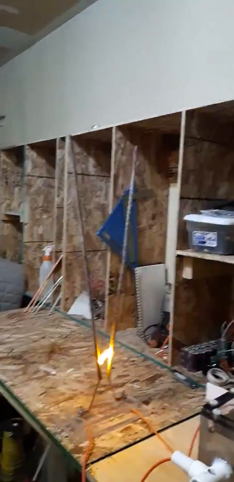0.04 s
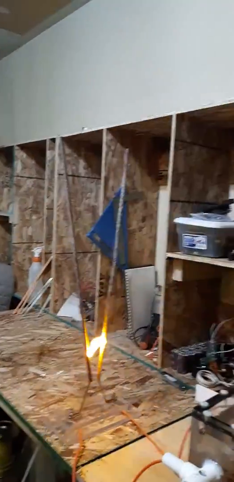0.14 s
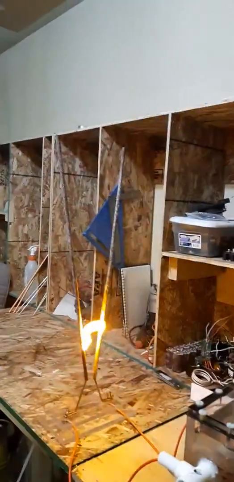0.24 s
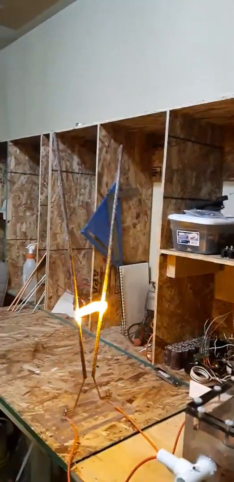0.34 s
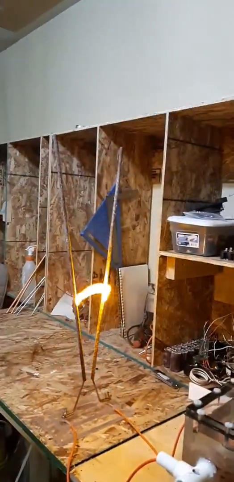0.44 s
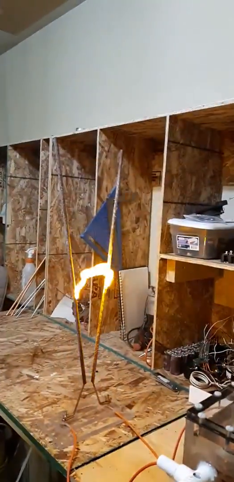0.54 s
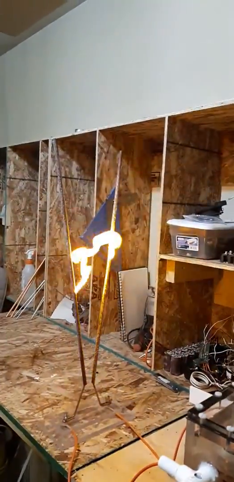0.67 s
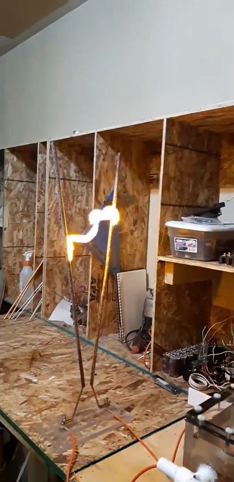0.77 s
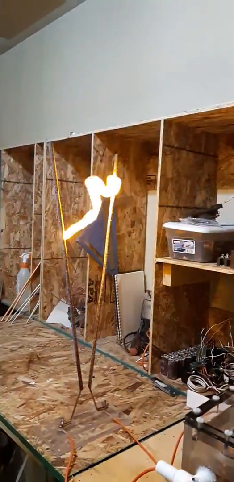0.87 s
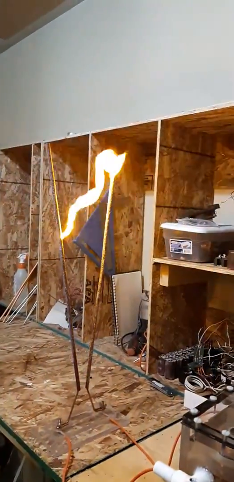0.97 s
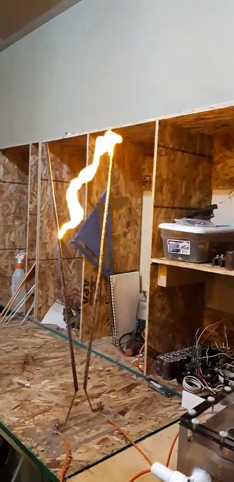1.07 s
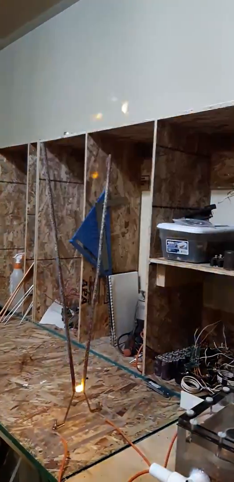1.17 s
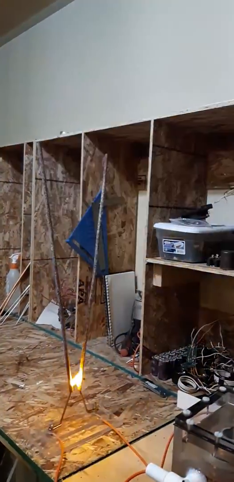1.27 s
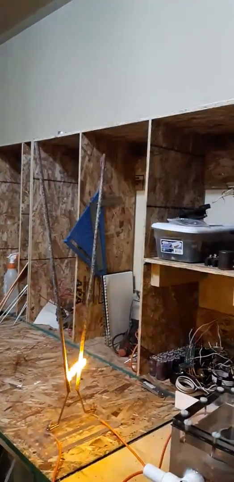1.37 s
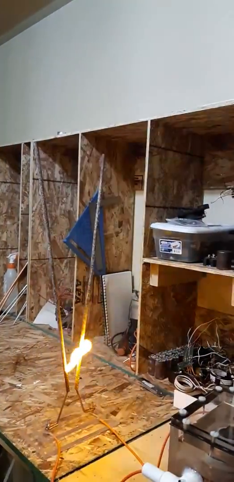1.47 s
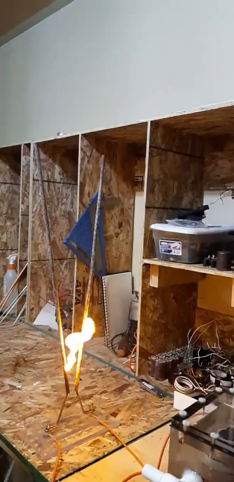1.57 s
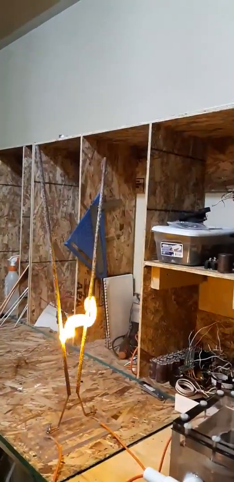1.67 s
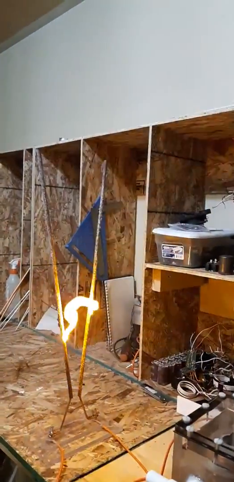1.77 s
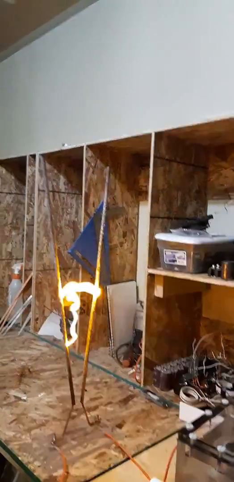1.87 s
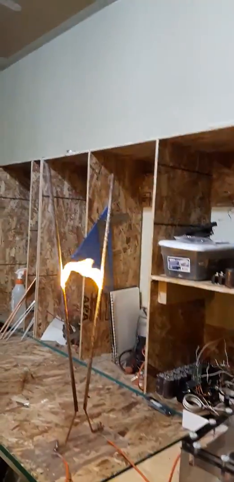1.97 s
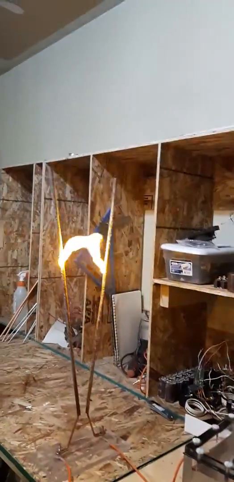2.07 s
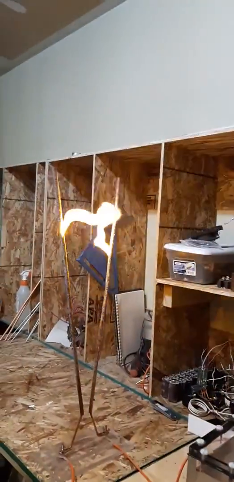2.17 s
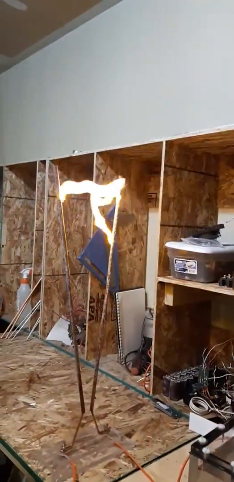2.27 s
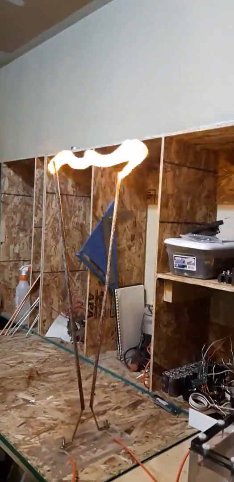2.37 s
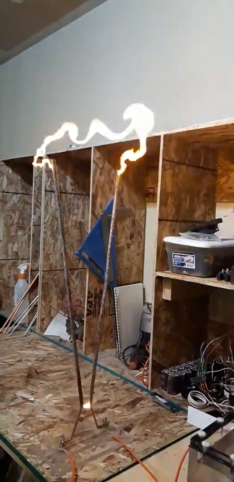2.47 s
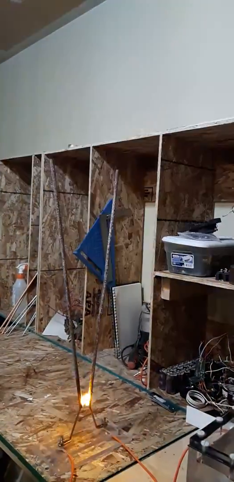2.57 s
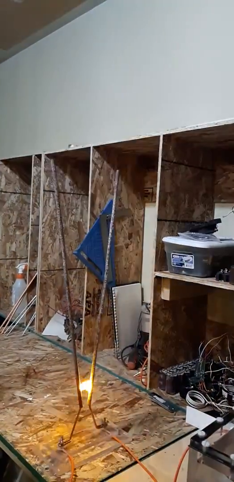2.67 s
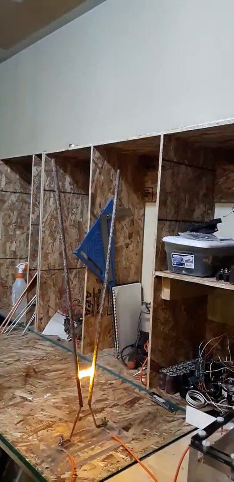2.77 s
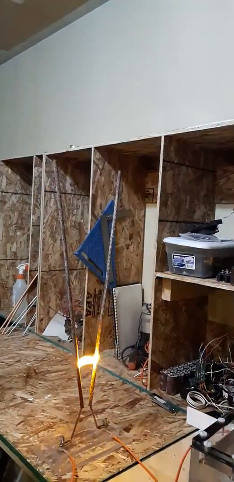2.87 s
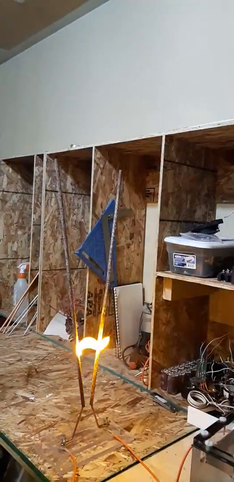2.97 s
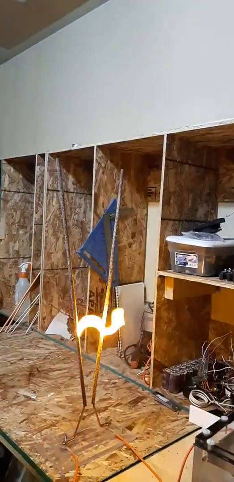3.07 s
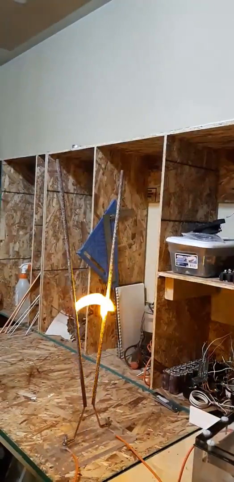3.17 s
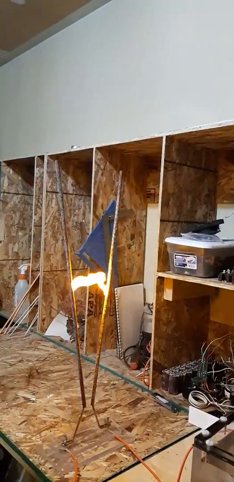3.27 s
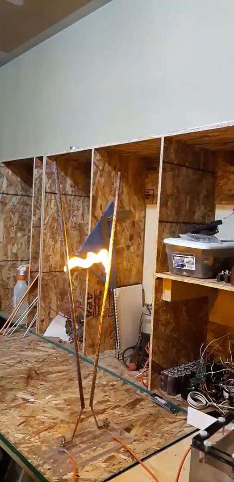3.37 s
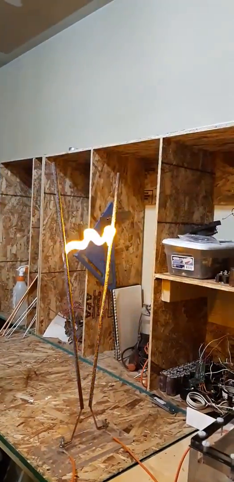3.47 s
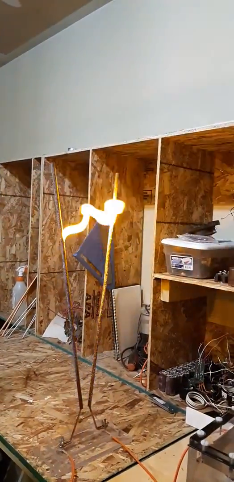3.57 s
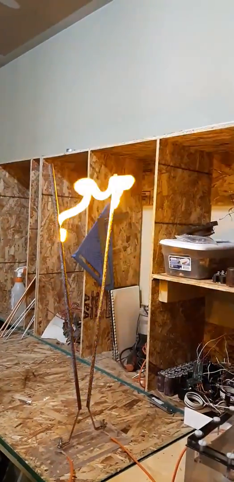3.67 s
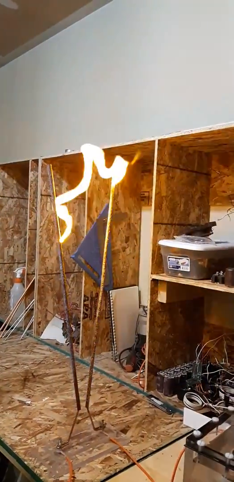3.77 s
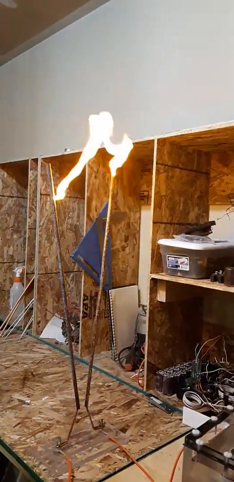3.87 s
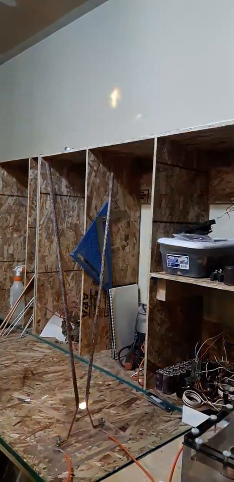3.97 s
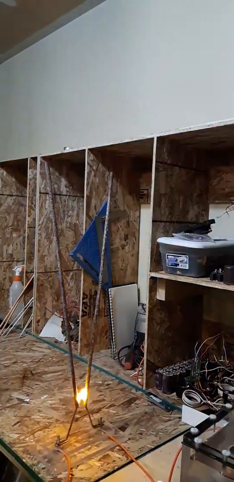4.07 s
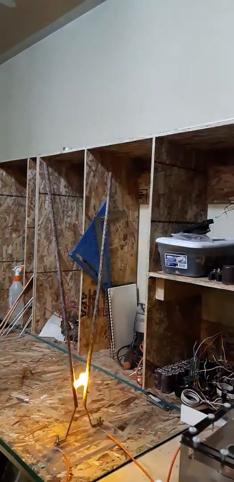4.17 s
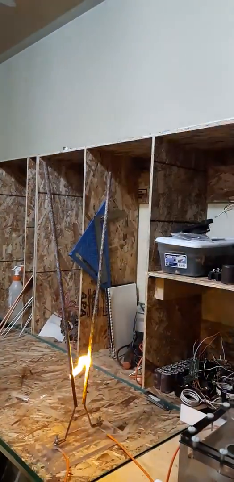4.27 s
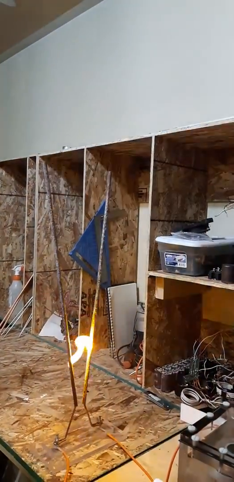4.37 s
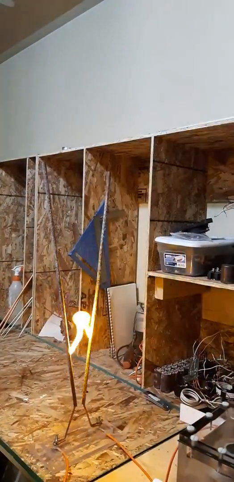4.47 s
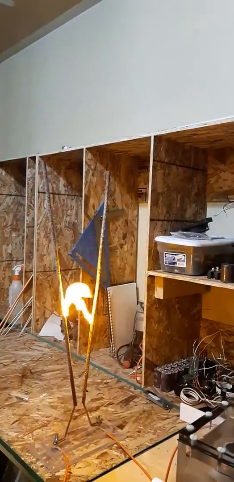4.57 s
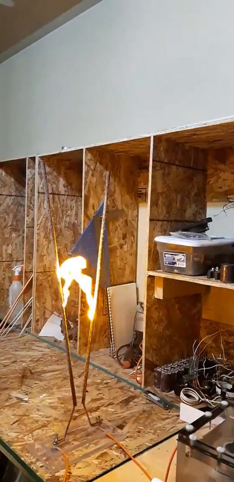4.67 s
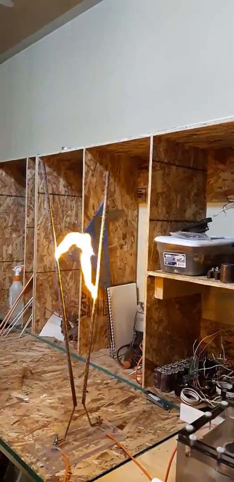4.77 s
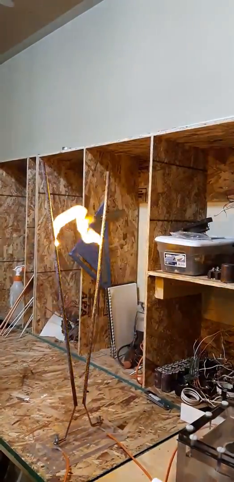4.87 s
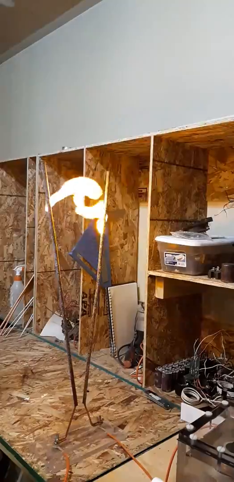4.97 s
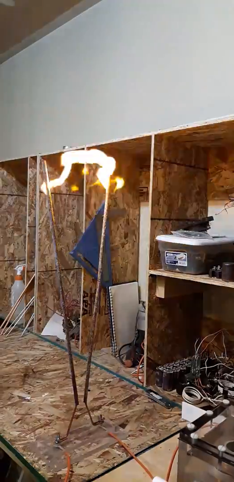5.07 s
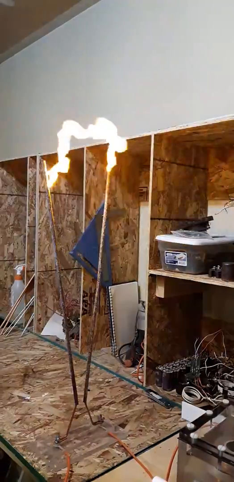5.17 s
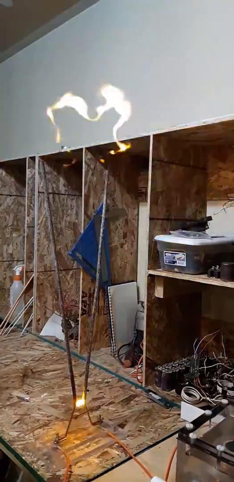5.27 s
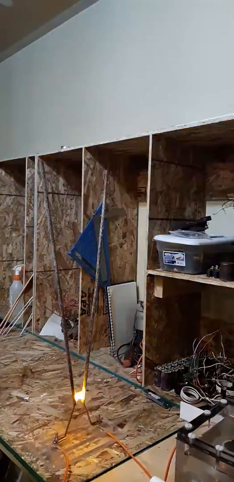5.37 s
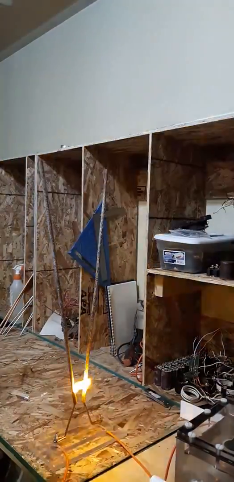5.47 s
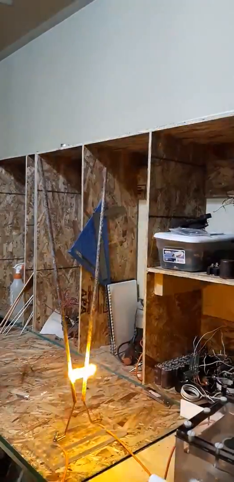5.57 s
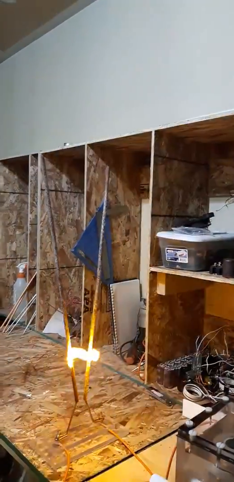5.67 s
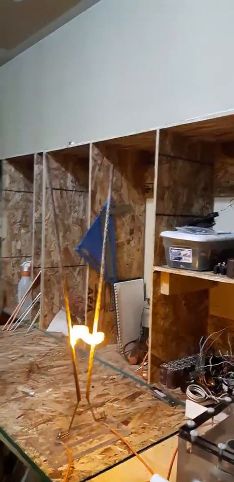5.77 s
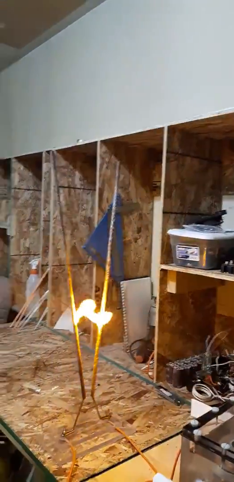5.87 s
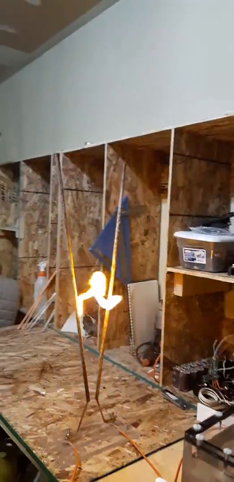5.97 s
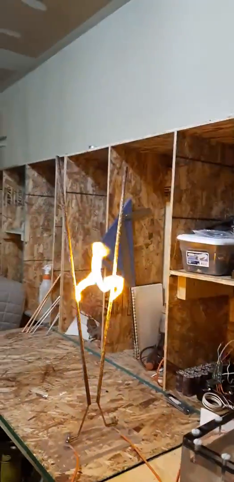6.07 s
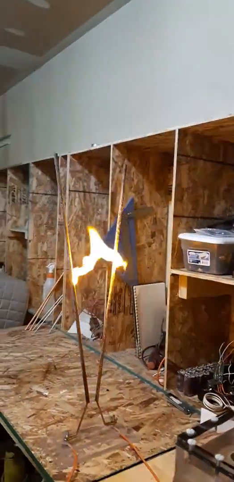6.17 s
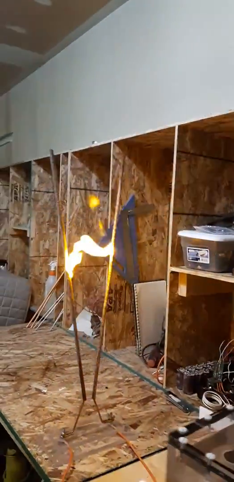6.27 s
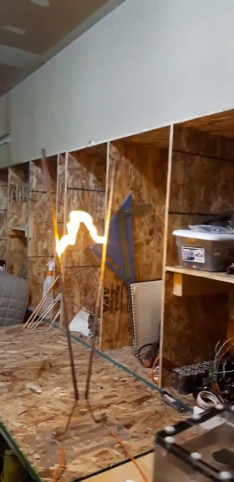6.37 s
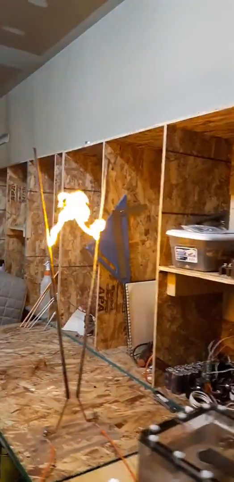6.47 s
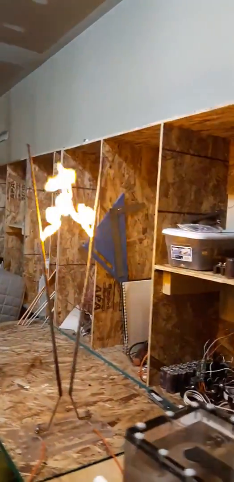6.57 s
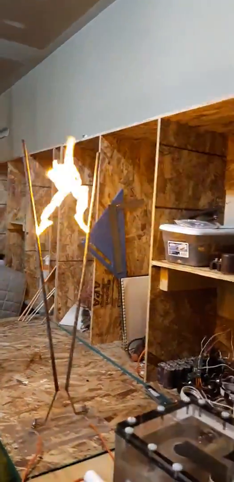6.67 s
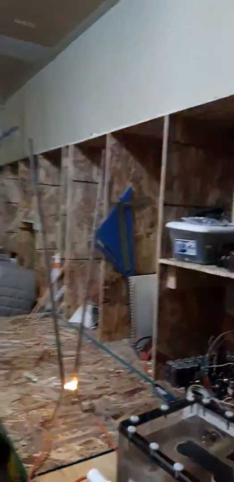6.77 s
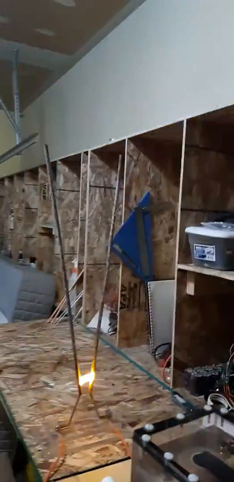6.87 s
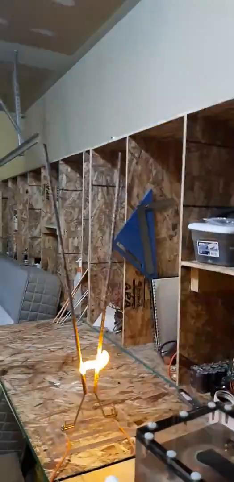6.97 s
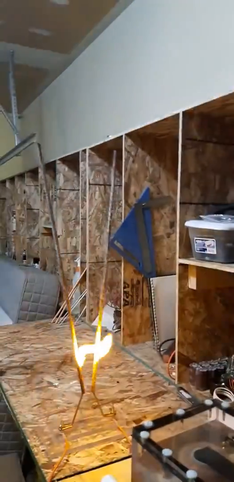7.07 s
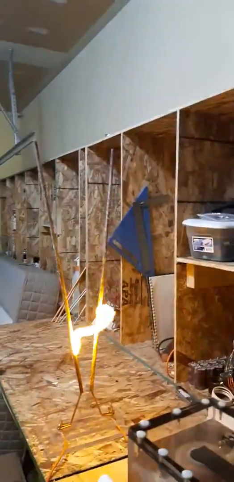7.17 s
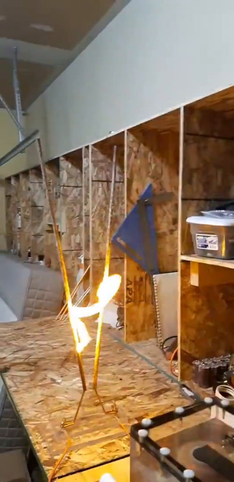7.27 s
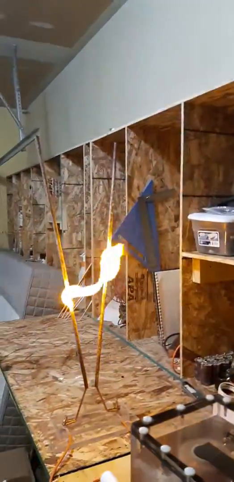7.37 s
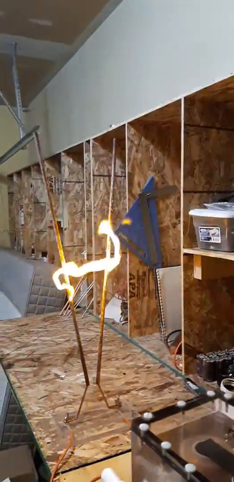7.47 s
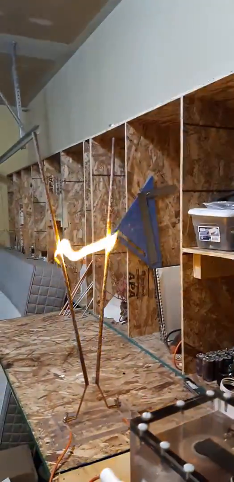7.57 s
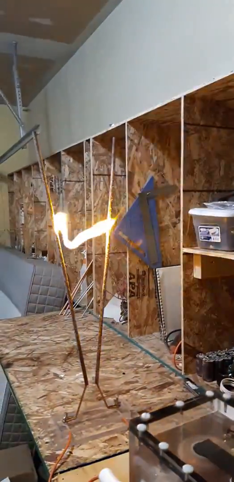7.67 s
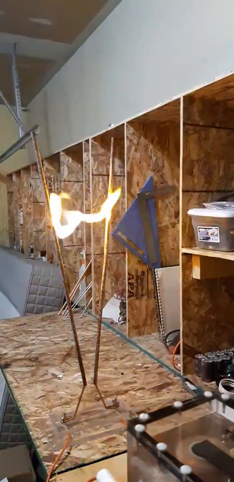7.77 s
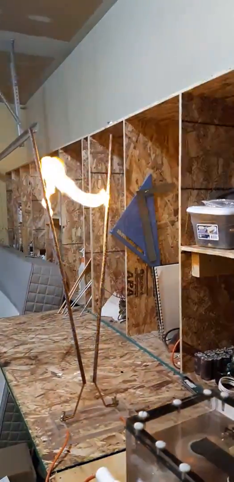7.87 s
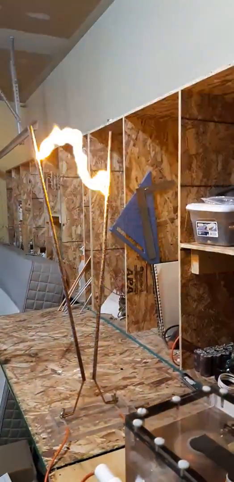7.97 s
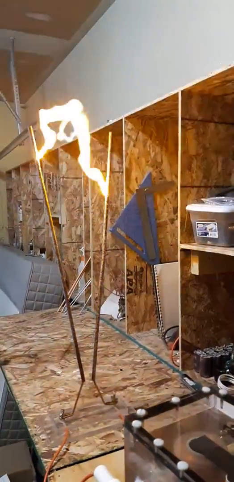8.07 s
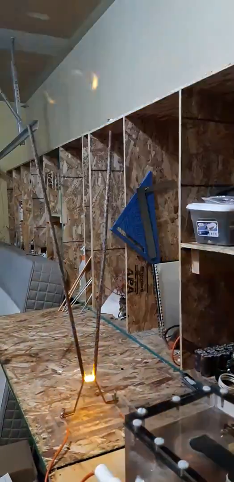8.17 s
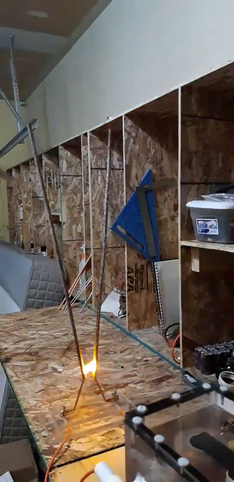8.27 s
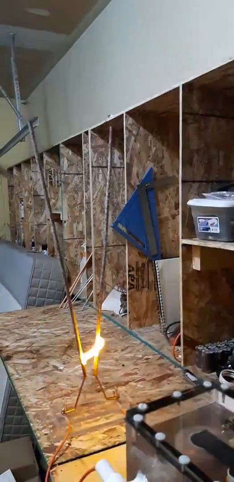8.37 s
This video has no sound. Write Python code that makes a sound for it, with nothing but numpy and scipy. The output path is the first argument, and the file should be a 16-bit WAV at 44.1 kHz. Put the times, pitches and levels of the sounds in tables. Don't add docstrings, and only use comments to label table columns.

```python
import sys
import numpy as np
from scipy import signal
from scipy.fft import rfft, irfft
from scipy.io import wavfile

SR = 44100
rng = np.random.default_rng(int(sys.argv[2]) if len(sys.argv) > 2 else 0)


def level_to_linear(level):
    exponent = np.asarray(level, float) / 20
    return 10 ** exponent


def generate_wav(signal):
    frames = np.transpose(np.atleast_2d(signal))
    scaled = np.clip(frames, -1, 1) * 32767
    pcm = np.round(scaled).astype(np.int16)
    wavfile.write(sys.argv[1], SR, pcm)


N = 371772

# time_s, level_db
RUMBLE = [(0.0, -66), (0.4, -74), (1.4, -69), (3.5, -72), (4.1, -72.5), (6.5, -69.5), (7.0, -64),
          (7.9, -63.5), (8.43, -67)]
# frequency_hz, level_db
ROOM_TONE = [(18, -42), (30, -11.5), (102, 6), (200, -7), (260, -30), (440, -120)]
# time_s, level_db, brightness_db
BURN = [(0.0, -47, 0.1), (0.15, -58, 0.1), (0.42, -55.5, -1.5), (0.56, -65, 8), (0.8, -60, -2.5),
        (1.1, -50, 6.5), (1.6, -60, -3), (2.2, -53, 2), (3.0, -57, 1.5), (3.6, -63, -2), (4.3, -60, 2.5),
        (4.8, -60.5, -3.5), (5.6, -59.5, 1.5), (6.2, -65.5, -3.5), (6.65, -56, -1), (7.2, -57, 3.2),
        (7.9, -63, -4), (8.43, -65, -0.5)]
# start_s, rise_db, length_s, brightness_db
FLARES = [(0.584, 14.5, 0.12, 1.5), (1.4, -1, 0.11, 15.5), (1.906, 0.5, 0.1, 1.5), (2.246, -4, 0.048, -7),
          (2.736, 4.5, 0.1, 2), (4.13, 3, 0.041, -3), (5.12, 1, 0.16, -5), (5.9, 4.5, 0.1, 1.5),
          (6.467, 7, 0.068, 13), (6.869, 11.5, 0.19, 1), (7.495, 5.5, 0.15, 6), (7.65, 2, 0.14, 4),
          (8.36, 2, 0.041, 14)]
# start_s, change_db, length_s, brightness_db
LULLS = [
    (2.1, -14, 0.09, 1.5),
    (3.1, -14, 0.061, 3),
    (7.2, -6.5, 0.053, -4),
    (6.2, -1, 0.055, -1),
    (4.95, 1.5, 0.072, -3),
]
# start_s, change_db, length_s
FIZZES = [(0.268, 5, 0.02), (1.324, -1, 0.1), (1.905, -4.5, 0.045), (2.03, 3, 0.13), (2.193, 7, 0.063),
          (2.7, -3, 0.081), (3.45, -4.5, 0.094), (3.574, 5.5, 0.026), (4.2, -5, 0.15), (4.433, 4, 0.04),
          (4.574, 4.5, 0.037), (5.82, -2, 0.08), (5.966, 4, 0.07), (6.087, 7, 0.035), (7.188, 7.5, 0.033),
          (7.258, 5, 0.031), (7.35, 4, 0.034), (7.82, 4, 0.091), (8.276, 17, 0.021), (8.38, 7, 0.033)]
# start_s, peak_db
TICKS = [(0.568, -47), (0.83, -46), (1.394, -44), (2.068, -43), (2.204, -40), (3.213, -44), (3.243, -45),
         (3.4, -41), (3.461, -40), (4.56, -46), (4.736, -43), (4.756, -41), (4.772, -46), (4.792, -36),
         (4.947, -36), (5.514, -46), (5.714, -44), (6.048, -42), (6.23, -42), (6.556, -28), (7.533, -32)]
# start_s, peak_db, sharpness_db, top_spit_db
SHORTS = [(0.694, -22.5, -3, 4), (0.923, -21.5, -3, -2), (0.943, -22, 2.5, 4), (1.017, -10.5, 1, -1),
          (1.617, -27.5, -5, 0), (1.876, -27.5, -8.5, -5), (2.248, -20.5, -2.5, -1), (2.285, -28.5, -21, 3),
          (2.331, -27.5, -2, -5), (3.099, -27.5, 1.5, 11), (3.82, -19.5, 0, -2), (3.894, -21, 0, 4.5),
          (4.828, -19, 5.5, 3), (5.056, -12, 0.1, -11), (6.075, -24.5, -0.3, 6), (6.134, -26.5, 2, 8.5),
          (6.253, -14, 2.5, 1), (6.459, -16.5, -1, -4), (6.503, -23, -6, 4.5), (6.543, -17.5, -2, 2.5),
          (6.57, -9.5, 1, 3), (6.668, -11.5, 0, -1), (7.29, -27.5, -8.5, 12.5), (7.463, -19, 4.5, -15),
          (7.498, -22.5, 3, -7), (7.753, -18.5, -0.8, -2), (7.797, -22, -3.5, 2), (7.825, -19.5, 3.5, -2),
          (7.941, -27, -27, 7), (8.043, -22, -7, -4)]
# start_s, peak_db, sharpness_db
HOPS = [(0.797, -35.5, 5), (0.849, -30.5, -6), (1.53, -36.5, 5), (1.704, -30, 1.5), (1.748, -32.5, -5),
        (1.912, -33, -1), (2.163, -35, 7), (2.221, -29.5, 1), (3.061, -39.5, 0.1), (3.194, -36, 2.5),
        (3.332, -45.5, 14.5), (3.367, -38, 6.5), (3.478, -35, 2.5), (3.595, -40, 8.5), (3.704, -29, 2.5),
        (3.744, -30, 0.5), (4.234, -41, 7), (4.526, -33, 5), (4.671, -34.5, 3), (4.712, -40, 10),
        (5.02, -39.5, 8), (5.829, -36.5, 1.5), (6.001, -36.5, -2), (6.155, -33.5, 3), (7.133, -27.5, -3),
        (7.347, -31, 0), (7.436, -28.5, 0.5), (7.566, -26, 1.5), (7.647, -26, 1.5), (8.29, -42, 11)]
# start_s, peak_db, hum_before_db
BREAKS = [
    (1.152, -1, -43),
    (2.475, -2, -51),
    (3.944, -6, -58),
    (5.261, -3.5, -46.5),
    (6.707, -0.5, -47),
    (8.143, -1.5, -45),
]
SHOCK_DB = [12.1, 9.2, 8.1, 5.6]
SHARP_SHARE = [-0.63, -0.18, 1.09, -0.022]
SPLIT_HZ = [500, 2500, 7000]
# start_s, peak_db
PICKUPS = [
    (0.992, -3.5),
    (2.8987, 0),
]
# start_s, peak_db
STATIC = [(2.042, -40), (2.056, -42), (2.069, -37), (2.091, -40), (2.097, -40), (2.111, -36), (2.122, -42),
          (2.163, -35), (2.334, -40), (3.578, -37), (4.563, -38), (4.737, -40), (6.35, -38)]
# frequency_hz, t60_s
ROOM_T60 = [(80, 0.23), (210, 0.56), (560, 0.56), (1470, 0.53), (3880, 0.5), (10200, 0.4)]
# delay_ms, level_db
ECHOES = [(1.7, -6), (2.6, -11), (4.1, -9), (6.4, -9), (8.2, -12), (11.0, -11)]
# frequency_hz, level_db, t60_s
BAYS = [(98, -35.5, 0.082), (196, -37, 0.082), (245.7, -26, 0.034), (280, -41, 0.041), (421.3, -46, 0.32),
        (628.6, -24, 0.022), (711, -35.5, 0.079), (806, -19.5, 0.016), (1130, -53, 0.027),
        (1250, -37.5, 0.041)]
# frequency_hz, left_db, right_db
PORTS = [(38, -15, -15), (85, -10, -7), (248, -3.5, -2), (766, 0.5, -0.5), (1390, -0.5, -2.5),
         (2660, -1, -3), (4120, -5, 1.5), (5065, -12, 4), (5356, -13.5, -4.5), (7620, -34, -20),
         (8920, -23, -12), (11640, -13.5, -10), (14000, -9, -45), (15740, -7.5, -8.5)]

FIRST_STRIKE_S, CLIMB_S = 0.15, 1.4
HUM_FOOT_DB, HUM_BEND = -86.5, 1
SHORTED_HUM_DB, REGROW_S = -3.5, 0.13
RUMBLE_CLIMB_DB = 5.5
FLARE_EDGE_S = 0.013
ROAR_DB = -5
CORONA_DB, CORONA_FOLLOWS, CORONA_BRIGHT = -66.5, 0.6, 0.29
TICK_SHARP_DB, TICK_SPIT_DB = 5, 3
TOP_FADES = 0.17
ONSET_S = 0.0015
FAR_END_MS, FAR_END_DB = 0.9, -13
DIRECT_DB, BUILD_S = 3.5, 0.002
RIGHT_LAG = 4
SECOND_TEAR_MS = 0.55
CUTOFF_HZ = 15740


def rms_one(x):
    return x / np.sqrt(np.mean(x ** 2) + 1e-20)


def at_hz(points, hz, column=1):
    table = np.array(points)
    return np.interp(np.log(np.maximum(hz, 1)), np.log(table[:, 0]), table[:, column])


def drift(rate):
    pole = np.exp(-80 * np.pi * rate / SR)
    noise = rng.standard_normal(N // 40 + 2002)
    slow = signal.lfilter([1], [1, -2 * pole, pole * pole], noise)[2000:]
    return np.interp(np.arange(N) / 40, np.arange(len(slow)), rms_one(slow))


def band_pass(order, low_hz, high_hz, x):
    return signal.sosfilt(signal.butter(order, [low_hz, high_hz], "band", fs=SR, output="sos"), x)


def four_bands(x):
    below = [signal.sosfilt(signal.butter(2, hz, fs=SR, output="sos"), x) for hz in SPLIT_HZ]
    return np.diff([0 * x, *below, x], axis=0)


def climb():
    s, _, hum_db = np.transpose(BREAKS)
    marks = np.r_[FIRST_STRIKE_S, s, s[-1] + CLIMB_S]
    turns = np.interp(np.arange(N) / SR, marks, np.arange(len(marks)))
    return turns % 1, np.r_[hum_db, hum_db.mean()][turns.astype(int)]


def swell(t, start, length):
    nearest_edge = np.minimum(t - start, (start + length - t) / 2)
    return np.clip(nearest_edge / FLARE_EDGE_S + 1, 0, 1)


def column_levels():
    t = np.arange(0, N / SR, 0.001)
    clock = np.arange(N) / SR
    s, *controls = np.transpose(BURN)
    level_db, bright_db = [np.interp(t, s, c) for c in controls]
    for start, rise_db, length, tip_db in FLARES + LULLS:
        lit = swell(t, start, length)
        level_db = level_db + rise_db * lit
        bright_db = bright_db + tip_db * lit

    height, tip_hum_db = climb()
    hum_db = HUM_FOOT_DB + (tip_hum_db - HUM_FOOT_DB) * height ** HUM_BEND
    shorts = np.transpose(SHORTS)[0]
    since_short = t - np.r_[-1, shorts][np.searchsorted(shorts, t)]
    hum_db = hum_db + np.interp(clock, t, SHORTED_HUM_DB * np.exp(-since_short / REGROW_S))

    corona_db = CORONA_DB + CORONA_FOLLOWS * (level_db + 57) + CORONA_BRIGHT * bright_db
    corona_db += sum(rise_db * swell(t, start, length) for start, rise_db, length in FIZZES)
    hiss_db = [level_db + ROAR_DB - bright_db, level_db, corona_db]
    return hum_db, *[np.interp(clock, t, c) for c in hiss_db]


def room_tone():
    shape = level_to_linear(at_hz(ROOM_TONE, np.fft.rfftfreq(N, 1 / SR)))
    mid, side = irfft(rfft(rng.standard_normal((2, N))) * shape, N)
    level = level_to_linear(np.interp(np.arange(N) / SR, *np.transpose(RUMBLE)) + RUMBLE_CLIMB_DB * climb()[0])
    return level * rms_one(mid + 0.22 * side * [[1], [-1]])


def hum():
    level = level_to_linear(column_levels()[0] + 2.5 * drift(30) + 0.5 * drift(8))
    pitch_hz = 239 + 4 * drift(20)
    tone = np.sin(2 * np.pi * np.cumsum(pitch_hz) / SR + [[0.3], [0]])
    mid, side = rng.standard_normal((2, N))
    flutter = rms_one(band_pass(2, 190, 350, mid + 0.13 * side * [[1], [-1]]))
    flutter_level = level * level_to_linear(-9.0) + level_to_linear(-85.5)
    return (level * tone + flutter_level * flutter) * level_to_linear(np.array([[-1.2], [1.2]]))


def column(count=4):
    _, roar_db, sizzle_db, corona_db = column_levels()
    clumps = 1.5 * np.tanh(drift(40) / 1.5)
    levels = [roar_db - 18.5, roar_db - 12.5, sizzle_db - 17.0, corona_db + 5.5]
    gains = [level_to_linear(level_db + clumps + 1.5 * drift(30) + drift(90)) for level_db in levels]
    heights = []
    for _ in range(count):
        sizes = level_to_linear(3.5 * np.minimum(rng.exponential(1, N), 4.5)) * rng.choice([-1, 1], N)
        born = rng.random(N) < 120 * level_to_linear(4.0 * clumps) / SR
        sparks = rms_one(sizes * born) + 0.45 * rng.standard_normal(N)
        heights.append(sum(gain * rms_one(band) for gain, band in zip(gains, four_bands(sparks))))
    return heights - 0.53 * band_pass(1, 400, 720, heights)


def room_response(early_db, early_s, tail_db, tear_share):
    size = SR // 2
    t = np.arange(size) / SR
    edges = 45 * 2 ** np.arange(0, 8.8, 0.5)
    tail = np.zeros((2, size))
    for low, high in zip(edges, edges[1:]):
        mid, side = band_pass(2, low, high, rng.standard_normal((2, size)))
        alike = 1 / (1 + (low / 430.0) ** 2)
        late_fall = level_to_linear(tail_db - 60 * t / at_hz(ROOM_T60, np.sqrt(low * high)))
        early_fall = level_to_linear(early_db - 60 * t / early_s)
        both = np.sqrt(1 + alike) * mid + np.sqrt(1 - alike) * side * [[1], [-1]]
        tail += (late_fall + early_fall) * both

    for (hz, bay_db, t60), (spread, skew) in zip(BAYS, rng.normal(0, 1, (len(BAYS), 2))):
        fall = level_to_linear(bay_db + 0.88 * np.tanh(spread) - 60 * t / t60)
        tail += fall * np.cos(2 * np.pi * hz * t + 0.16 * skew * np.array([[1], [-1]]))
    tail *= np.clip(t / BUILD_S, 0, 1)

    rays = np.zeros((2, size))
    rays[[0, 1], [0, RIGHT_LAG]] = level_to_linear(DIRECT_DB)
    for (ms, echo_db), (shift, skew) in zip(ECHOES, rng.normal(0, 1, (len(ECHOES), 2))):
        at = ms * SR / 1000 * (1 + 0.06 * shift)
        rays[[0, 1], [int(at), int(max(at + 5 * skew, 0))]] += level_to_linear(echo_db)
    _, _, upper, top = four_bands(rays + 1e-18)
    second_tear = np.roll(upper + top, int(SECOND_TEAR_MS * SR / 1000), axis=1)
    tail += tear_share * second_tear * [[0.4], [1]]
    return tail + rays + [[0], [0.6]] * upper - 0.95 * top


def colour(x, gain_db):
    cepstrum = irfft(np.log(level_to_linear(gain_db)))
    half = len(cepstrum) // 2
    cepstrum[1:half] *= 2
    cepstrum[half + 1:] = 0
    return signal.oaconvolve(x, irfft(np.exp(rfft(cepstrum)))[:half])[:len(x)]


def snaps(count=4):
    breaks = [(s, peak_db, 0, 0) for s, peak_db, _ in BREAKS]
    hops = [(*hop, 0) for hop in HOPS]
    ticks = [(*tick, TICK_SHARP_DB, TICK_SPIT_DB) for tick in TICKS]
    rows = np.array(breaks + SHORTS + hops + ticks)
    parts_db = rows[:, 1:2] + SHOCK_DB + rows[:, 2:3] * SHARP_SHARE
    parts_db[:, 3] += TOP_FADES * rows[:, 1] + rows[:, 3]
    clicks = np.zeros((count, 4, N))
    for k, (s, gain) in enumerate(zip(rows[:, 0] + ONSET_S, level_to_linear(parts_db))):
        place = 0 if k < len(BREAKS) else 1 + k % (count - 1)
        clicks[place, :, int(s * SR)] = -gain
        late = int((s + FAR_END_MS * rng.uniform(0.15, 1) / 1000) * SR)
        clicks[place, 1:, late] -= gain[1:] * level_to_linear(FAR_END_DB)
    return sum(four_bands(clicks[:, b] + 1e-18)[b] for b in range(4))


def pickup():
    kicks = np.zeros(N)
    for s, peak_db in PICKUPS:
        kicks[int((s - 0.0005) * SR)] = level_to_linear(peak_db)
    t = np.arange(1200) / SR
    ring_hz, ring_s, swing_s = 4750, 0.00017, 0.0008
    late = t - 0.0006
    ring_width = ring_s * np.where(late > 0, 1.6, 1)
    shape = -np.cos(2 * np.pi * ring_hz * late) * np.exp(-(late / ring_width) ** 2)
    shape += 0.09 * np.maximum(late / swing_s, 0) * np.exp(1 - late / swing_s)
    shape -= 0.16 * np.exp(-(late / 0.000085) ** 2)
    coupling = signal.butter(2, 130.0, "high", fs=SR, output="sos")
    shape = signal.sosfilt(coupling, shape)
    return signal.oaconvolve(kicks, shape)[:N] * [[0.05], [1]]


def static():
    s, peak_db = np.transpose(STATIC)
    kicks = np.full(N, 1e-18)
    kicks[(s * SR).astype(int)] = level_to_linear(peak_db + 5.0)
    return band_pass(2, 7500, 14000, kicks)


def scene():
    air = 0
    for shocks, burning, tear_share in zip(snaps(), column(), [1.3, 0, 0, 0]):
        response = room_response(early_db=-17.5, early_s=0.025, tail_db=-27, tear_share=tear_share)
        air = air + signal.oaconvolve((shocks + burning)[None], response, axes=1)[:, :N]
    hz = np.fft.rfftfreq(4096, 1 / SR)
    ports = np.array([colour(air[k], at_hz(PORTS, hz, column=k + 1)) for k in range(2)])
    return ports + hum() + room_tone() + pickup() + static()


def band_limit(x):
    return signal.sosfilt(signal.butter(12, 16980, fs=SR, output="sos"), x)


def record(dry):
    held = dry / (1 + dry ** 8) ** (1 / 8)
    low_pass = signal.ellip(8, 0.5, 42, CUTOFF_HZ, fs=SR, output="sos")
    return band_limit(signal.sosfilt(low_pass, held))


dry = scene()
out = record(dry)
generate_wav(out)
```